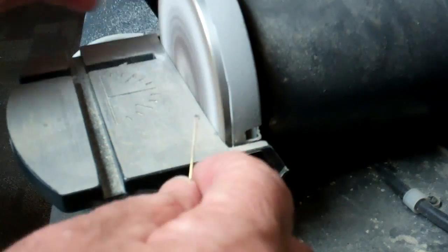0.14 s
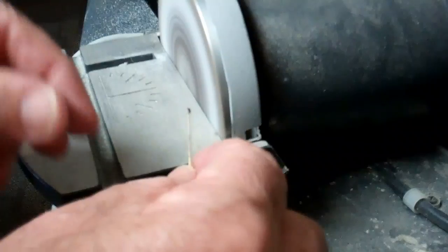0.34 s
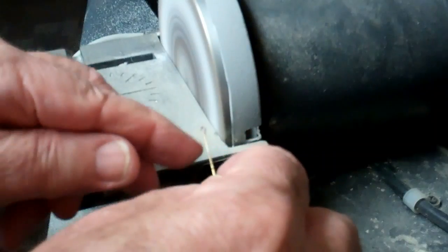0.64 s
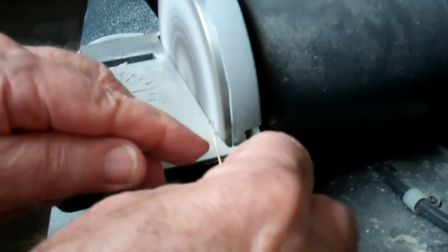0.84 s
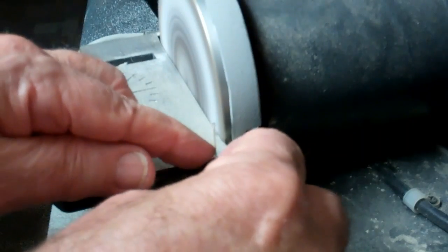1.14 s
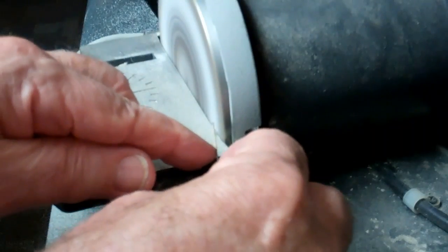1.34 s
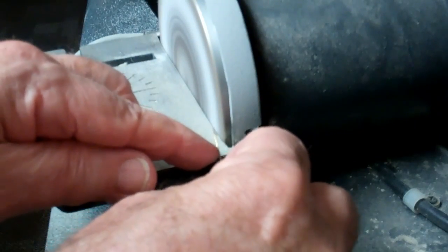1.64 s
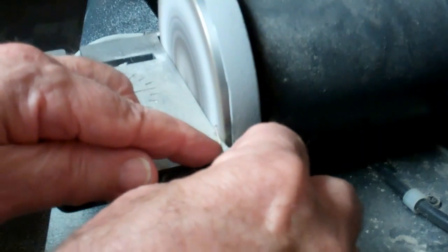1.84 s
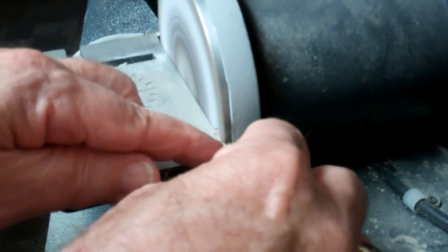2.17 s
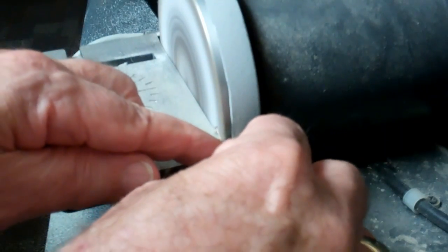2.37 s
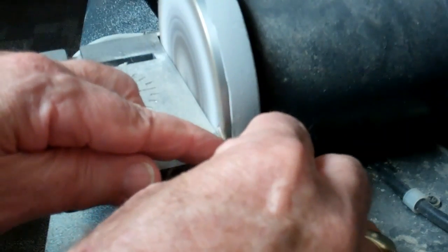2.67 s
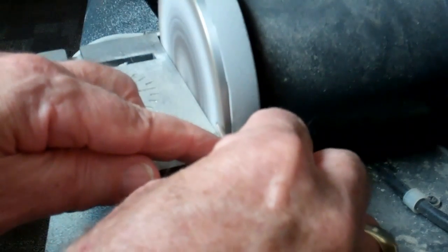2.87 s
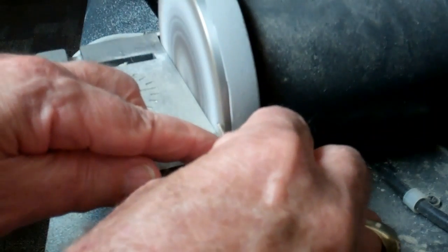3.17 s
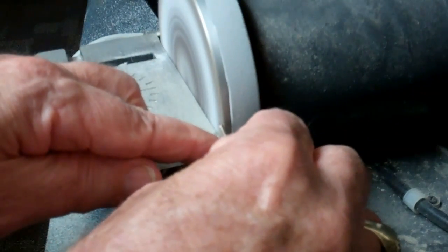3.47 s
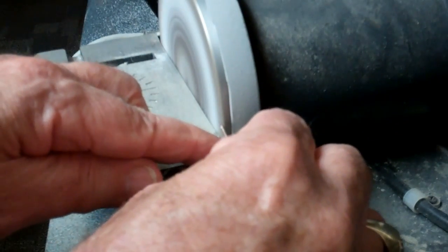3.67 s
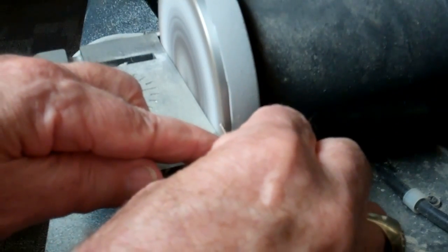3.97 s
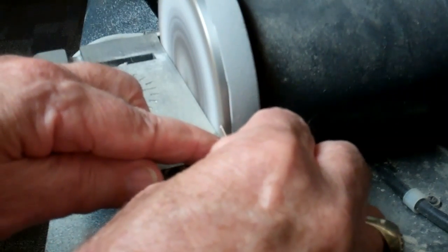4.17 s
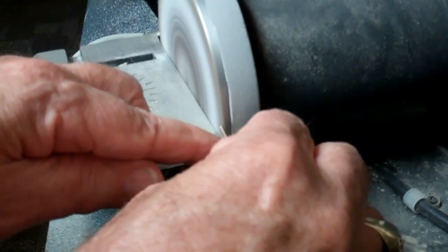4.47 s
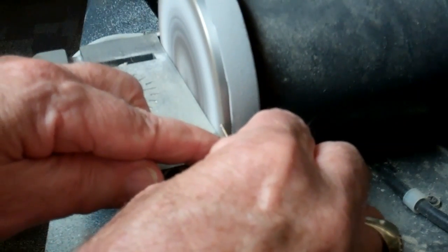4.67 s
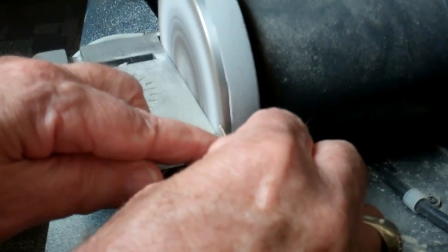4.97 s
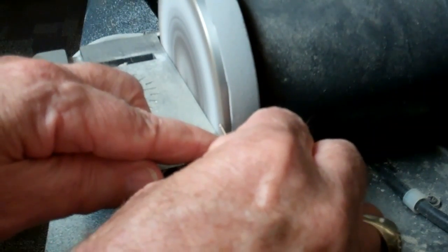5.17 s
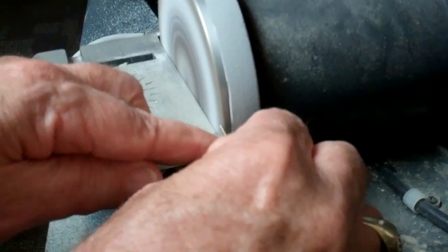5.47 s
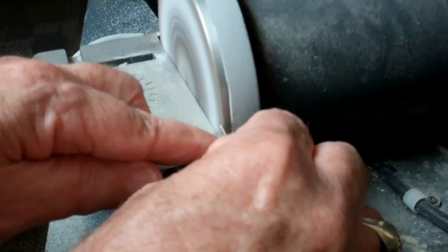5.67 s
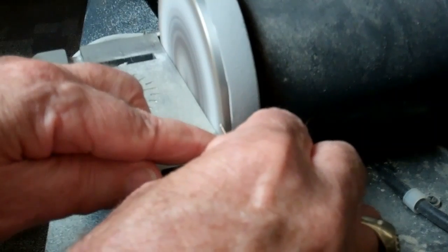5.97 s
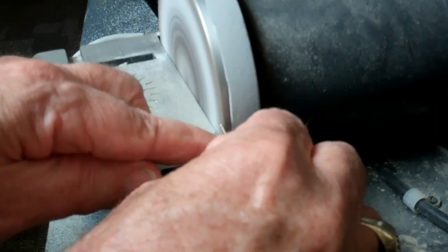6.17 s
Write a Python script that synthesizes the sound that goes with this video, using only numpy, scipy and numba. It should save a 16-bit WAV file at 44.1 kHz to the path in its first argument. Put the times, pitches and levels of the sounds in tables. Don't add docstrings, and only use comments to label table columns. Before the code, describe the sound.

Close electric motor start-up with a rattling shudder, then constant hum and hiss with whistling swells, followed by bright, gritty metal scraping on a spinning disc.

```python
import sys
import numpy as np
from scipy import signal
from scipy.fft import rfft, irfft
from scipy.io import wavfile
from scipy.ndimage import uniform_filter1d
from numba import njit

SR = 44100
rng = np.random.default_rng(int(sys.argv[2]) if len(sys.argv) > 2 else 0)


def gain_from_decibels(decibels):
    exponent = np.asarray(decibels, float) / 20
    return 10 ** exponent


def put_to_file(sound):
    columns = np.atleast_2d(sound).T
    safe = np.clip(columns, -1, 1)
    whole_steps = np.round(safe * 32767)
    wavfile.write(sys.argv[1], SR, whole_steps.astype(np.int16))


N = 278622
T = np.arange(N) / SR
F = np.fft.rfftfreq(N, 1 / SR)

SHAFT_HZ, MAINS_HZ, BALL_HZ = 59.71, 60, 261.02
LOCK_S = 0.41
TOP_HZ = 14200

# pitch_hz, left_minus_right_db
MOTOR_PAN = [(60, -2.5), (110, 10), (200, -3.5), (380, 2.5), (700, -2.5), (1290, -0.5), (2370, 2.0),
             (4380, 2.5), (8090, 2.5), (14900, 3.0)]
# start_s, length_s, pressure_db, drift_db (by the end), lifted_share (0-1, by the wobble)
STROKES = [
    (4.074, 0.16, -7, -7.5, 0.51),
    (4.296, 0.024, -24, 2, .6),
    (4.616, 0.25, -8.5, -4, 0.53),
    (5.148, .23, -12, -9, 0.84),
    (5.198, 0.11, -18.5, -2, 0.54),
    (5.701, 0.073, -28.5, 8, .5),
    (5.385, .085, -10, -3, .96),
    (5.455, .1, -16, -10, .92),
    (5.753, 0.64, -19, 5, 0.46),
    (5.827, 0.511, -21.5, 5, 0.13),
]


def set_rms(x, db):
    return x * gain_from_decibels(db) / np.sqrt(np.mean(x ** 2))


def along_hz(points):
    hz, value = np.transpose(points)
    return np.interp(np.log(np.minimum(F + 1, TOP_HZ - 100)), np.log(hz), value)


def resonances(modes, order=1):
    total = 0
    for k, (hz, width, db) in enumerate(modes):
        damping = 1j * width * order * F
        peak = damping / (hz ** 2 - F ** 2 + damping)
        total = total + (-1) ** k * gain_from_decibels(db) * peak ** order
    return total


def comes_round(share, hz):
    return 1 / (1 - share * np.exp(-2j * np.pi * F / hz))


def walk(rate):
    hold = int(SR / rate)
    steps = np.repeat(rng.standard_normal(N // hold + 1), hold)
    return 1.3 * uniform_filter1d(uniform_filter1d(steps, hold), hold)[:N]


def ports(drive, colour, pan_db, lag, diffuse_hz):
    direct, left, right = rfft(drive, axis=1)
    diffuse = (F + 250) / (F + diffuse_hz + 250)
    late = np.exp(-2j * np.pi * F * lag / SR)
    shared = np.sqrt(1 - diffuse ** 2) * direct * np.array([late, late ** 0])
    pair = shared + diffuse * np.array([left, right])
    return irfft(pair * colour * gain_from_decibels(np.array([pan_db, -pan_db]) / 2), N, axis=1)


def tone(turns, db, pan_db, lead_rad, flicker_db):
    phase = 2 * np.pi * (turns + rng.random())
    side = np.array([[.5], [-.5]])
    peak = np.sqrt(2) * gain_from_decibels(db + flicker_db * walk(9) + side * pan_db)
    return peak * np.sin(phase + side * lead_rad)


def run_up():
    # start_s, speed_share
    points = [
        (0, 0.074),
        (.2, 0.53),
        (.33, 0.79),
        (.42, .93),
        (.48, 1.0),
    ]
    s, share = np.transpose(points)
    return np.interp(T, s, share)


def slip_beat(speed):
    inrush = np.exp(-(T / 0.055) ** 2)
    buzz = (tone(MAINS_HZ * T, -51, 0.9, 0, 0) + tone(3 * MAINS_HZ * T, -48, 1, 0, 0)) * inrush
    beat = 1 - .5 * np.cos(4 * np.pi * (MAINS_HZ - SHAFT_HZ) * (T - 1.33))
    return tone(2 * MAINS_HZ * T, -46.5, .4, 0.092, 0.4) * beat * speed ** 1.9 + buzz


def start_up(speed):
    # pitch_hz, width_hz, level_db
    housing = [(180, 25, -8), (470, 30, -4), (950, 30, -3), (1380, 30, -4), (3070, 50, -3), (3780, 40, -5)]
    # shaft_multiple, centre_s, length_s, level_db
    sweeps = [
        (58, .285, .018, -41),
        (66, .44, .02, -38),
        (2.8, .46, .025, -42),
    ]
    shake_db = -29 - 300 * np.clip(T - LOCK_S, 0, None)
    shake = ports(rng.standard_normal((3, N)), resonances(housing), along_hz(MOTOR_PAN), 2.6, 7000)
    out = set_rms(shake, 0) * gain_from_decibels(shake_db) * speed ** 1.5
    turns = SHAFT_HZ * np.cumsum(speed) / SR
    for multiple, centre_s, length_s, db in sweeps:
        out = out + tone(multiple * turns, db, 0, 0, 0) * np.exp(-((T - centre_s) / length_s) ** 2)
    return out


def running_tones(speed):
    # shaft_multiple, level_db, left_minus_right_db, left_lead_rad
    shaft_lines = [(1, -48.0, -0.0, -0.0), (3, -48.4, -1.9, -0.1), (4, -42.6, -0.3, -0.2),
                   (5, -49.4, -0.5, -0.2), (7, -58.8, 3.5, 0.1), (8, -44.5, 2.8, -0.5),
                   (9, -58.1, 2.2, 0.2), (11, -56.7, 0.2, -0.1), (12, -40.4, -2.3, -0.5),
                   (13, -52.8, -2.6, 0.0), (16, -47.4, -1.7, -0.1), (18, -50.5, -1.4, 0.1),
                   (20, -50.8, -0.5, 0.4), (29, -53.8, 3.1, 0.3), (33, -55.7, 3.5, -0.1),
                   (49, -50.8, 2.5, -1.1), (50, -49.2, 6.4, -0.2), (51, -41.8, 3.6, -0.1),
                   (53, -53.9, 8.0, 0.5)]
    # shaft_multiple, mains_multiple, level_db, left_minus_right_db, left_lead_rad
    slot_lines = [(0, 2, -45.6, 0.4, 0.1), (17, 0, -40.0, -3.3, -0.2), (17, 2, -38.7, -0.8, -0.1),
                  (17, 4, -45.8, -2.5, 0.3), (17, 6, -32.7, -1.7, 0.2), (18, 4, -48.5, -2.2, 0.5),
                  (18, 6, -47.4, 0.1, 1.3), (19, 6, -47.2, -2.7, -0.3)]
    # ball_multiple, level_db, left_minus_right_db, left_lead_rad
    ball_lines = [(1, -52.3, -0.4, -0.1), (10, -57.3, -7.7, -1.1), (11, -52.1, -3.7, -0.9),
                  (12, -42.8, 2.8, -0.3), (13, -39.1, -2.2, -1.3), (14, -47.2, 2.8, -0.6),
                  (15, -48.0, -8.0, -1.3), (16, -48.9, 5.1, 0.2)]
    # pitch_hz, level_db, left_minus_right_db, left_lead_rad
    race_lines = [(157.1, -46.9, -0.6, -0.1), (906.2, -45.7, -0.5, -0.1), (1325.8, -50.6, 0.1, 0.8),
                  (1362.9, -50.2, -4.7, 1.0), (3316.5, -50.8, 2.8, -0.7), (3428, -55.1, 1.9, -1.4),
                  (3765.6, -50.5, 3.4, -0.4), (3867.4, -53.6, 2.7, -1.5), (4118.5, -53.1, 8.0, 0.5),
                  (5162.1, -51.8, 8.0, -2.3), (5540.5, -48.6, 7.1, -1.4), (5547.7, -50.7, 7.0, -2.0),
                  (5617.2, -51.4, 7.2, -2.5), (5943.8, -49.7, 7.0, -2.0), (6467.2, -49.7, 1.9, -2.3),
                  (6505.2, -50.1, -2.4, -2.3)]
    run_s = np.cumsum(speed) / SR + 6e-6 * walk(5.24)
    shaft = sum(tone(k * SHAFT_HZ * run_s, *rest, 0.1 + 0.038 * k) for k, *rest in shaft_lines)
    slots = sum(tone(k * SHAFT_HZ * run_s + m * MAINS_HZ * T, *rest, .6) for k, m, *rest in slot_lines[1:])
    balls = sum(tone(k * BALL_HZ * run_s, *rest, 1.15) for k, *rest in ball_lines)
    race = sum(tone(hz * run_s, *rest, 2.9) for hz, *rest in race_lines)
    return (shaft + balls + race * gain_from_decibels(-.5)) * speed ** 7.5 + slots * gain_from_decibels(.8) * speed ** 9.5


def roar(speed):
    # pitch_hz, density_db_per_hz
    rumble_db = [(18, -44), (30, -30), (103, -21.5), (149, -13), (194, -14), (238, -7.5), (340, -4.5),
                 (467, 1), (618, -15.5), (717, 0.5), (1120, 1), (1230, -11), (1350, -6), (1490, -7),
                 (2600, -12.5), (3380, -28), (5720, -120)]
    hiss_db = [(1410, -22.5), (2400, -24.5), (2740, -16.5), (3060, -4), (3230, -7), (3500, -2.5),
               (3580, -6.5), (4440, -7.5), (5540, -3.5), (6670, -5), (7460, -12), (8840, -8), (9810, -15),
               (12900, -10), (14100, -9.5)]
    # pitch_hz, width_hz, level_db
    panels = [(2145, 29, 20), (3100, 57, -12.5), (3650, 22, 2.5), (4210, 140, -9), (5360, 95, -9),
              (6230, 44, -7), (6620, 90, -6.5)]
    pan_db = along_hz(MOTOR_PAN)
    noise = rng.standard_normal((2, 3, N))

    pull = 1 + 0.26 * np.sin(4 * np.pi * MAINS_HZ * T) + 0.13 * np.sin(8 * np.pi * MAINS_HZ * T)
    throb = noise[0] * pull * gain_from_decibels(0.66 * walk(14))
    rumble = ports(throb, gain_from_decibels(along_hz(rumble_db)), pan_db, 2.2, 7400)

    angle = 2 * np.pi * np.cumsum(speed) / SR
    flap = 1 + 0.062 * np.sin(SHAFT_HZ * angle) + 0.089 * np.sin(BALL_HZ * angle)
    air = gain_from_decibels(along_hz(hiss_db)) * (1 + abs(resonances(panels)) * gain_from_decibels(4))
    air = air * comes_round(.25, BALL_HZ / 11)
    hiss = ports(noise[1] * flap * gain_from_decibels(0.48 * walk(20)), air, pan_db, 2.68, 2670)

    surge_db = 2 * np.exp(-((T - LOCK_S - .04) / 0.28) ** 2)
    rumble = set_rms(rumble, -30) * gain_from_decibels(24 * (speed - 1))
    return rumble + set_rms(hiss, -26.5) * speed ** 1.83 * gain_from_decibels(surge_db)


def singing(speed):
    # peak_s, build_up_s, level_db
    swells = [
        (.48, .2, -40),
        (1.08, 0.26, -36),
        (2.03, .25, -28.5),
        (2.87, 0.33, -26.5),
        (3.62, 0.28, -26),
        (4.41, 0.28, -27),
        (5.17, .25, -27),
        (5.86, 0.32, -36),
    ]
    loudness = gain_from_decibels(-53)
    for peak_s, rise_s, db in swells:
        width_s = np.where(T < peak_s, rise_s, 0.097)
        loudness = loudness + gain_from_decibels(db) * np.exp(-((T - peak_s) / width_s) ** 2)
    return tone(3097 * T + .025 * walk(12), 0, 2.2, -.95, 1.0) * loudness * speed


def strokes():
    lean_s, let_go_s = 0.033, 0.0034
    press, fresh_db, lift = 1e-9, 0, 0
    for start_s, length_s, db, drift_db, share in STROKES:
        age = np.clip(T - start_s, 0, None)
        gone = np.clip(age - length_s, 0, None)
        one = gain_from_decibels(db + drift_db * age / length_s) * (1 - np.exp(-age / lean_s)) * np.exp(-gone / let_go_s)
        press = press + one
        lift = lift + one * share
        fresh_db = fresh_db + one * 2 * np.exp(-age / 0.024)
    light = (np.maximum(press, gain_from_decibels(-40)) / gain_from_decibels(-18)) ** (0.89 - 1)
    return press, light * gain_from_decibels(fresh_db / press), np.clip(lift / press, 0, 1)


def grit_bites():
    # start_s, peak_db
    bites = [(4.0805, -34), (4.0977, -10), (4.6199, -42), (4.6314, -23), (4.6492, -12), (5.1567, -9),
             (5.1679, 2.5), (5.391, 2), (5.406, -1), (5.423, 5), (5.442, 2), (5.457, 6)]
    force = 0
    for start_s, db in bites:
        age = np.clip(T - start_s, 0, None)
        force = force + gain_from_decibels(db - 12) * (1 - np.exp(-age / .0008)) * np.exp(-age / .0035)
    return force


def grinding():
    # pitch_hz, width_hz, level_db
    wire = [(3350, 58, -13), (5310, 62, .5), (5790, 46, -7), (8210, 76, -2), (8790, 63, -9)]
    # pitch_hz, density_db_per_hz
    grit = [(1500, -60), (2600, -29), (4000, -35), (4800, -21), (6300, -21), (7050, -36), (7600, -14),
            (9200, -24), (9750, -16), (11000, -23), (11700, -15), (12300, -13), (13000, -18), (14100, -14)]
    press, treble, lift = strokes()
    turn = SHAFT_HZ * T + 1.0 / (2 * np.pi)
    uneven = gain_from_decibels(1.6 * rng.standard_normal(N // 500))[(turn + .5).astype(int)]
    angle = 2 * np.pi * turn
    high_spot = (.5 + .5 * np.cos(angle + .4 * np.cos(angle))) ** 1.05
    wobble = (1 - lift + lift * high_spot) / (1 - 0.35 * lift)
    press = press * uneven * wobble * gain_from_decibels(-1.5)
    bite = grit_bites()
    bright = press * treble + bite * gain_from_decibels(-4.5)
    press = press + bite

    grains = rng.standard_normal((2, 3, N)) * gain_from_decibels(1.3 * rng.exponential(size=(2, 1, N)))
    grains = irfft(rfft(grains, axis=2) * comes_round(.6, SHAFT_HZ), N, axis=2)
    upper = 1 / (1 + (7050 / (F + 1)) ** 20)
    ring = gain_from_decibels(along_hz(grit)) * gain_from_decibels(2.0) * 1j + resonances(wire, order=2)
    pan_db = np.full(len(F), 7.0)
    out = 0
    for drive, force, band, db in zip(grains, (press, bright), (1 - upper, upper), (-.5, .3)):
        colour = ring * band * (F < TOP_HZ)
        gain = gain_from_decibels(db) / np.sqrt(np.mean(drive ** 2) * np.mean(abs(colour) ** 2))
        out = out + gain * ports(drive * force, colour, pan_db, 0, 9000)
    return out * wobble ** .4 * (T > STROKES[0][0])


def scene():
    speed = run_up()
    motor = slip_beat(speed) + start_up(speed) + running_tones(speed) + roar(speed)
    return motor + singing(speed) + grinding()


@njit
def follow(x, up, down):
    out, e = np.empty(len(x)), 0.
    for i in range(len(x)):
        e += (x[i] - e) * (up if x[i] > e else down)
        out[i] = e
    return out


def gain_control(dry):
    grab_s, hang_s, recover_s = 0.01, 0.051, 0.12
    treble = irfft(rfft(dry.mean(0)) / (1 + (4730 / (F + 1)) ** 8), N)
    power = uniform_filter1d(treble ** 2, size=200)
    heard = follow(np.sqrt(abs(power)), 1 / (grab_s * SR), 1 / (recover_s * SR))
    heard = follow(heard, 1., 1 / (hang_s * SR))
    return (1 + (heard / gain_from_decibels(-26.5)) ** 16) ** (-0.94 / 16)


def roll_off(x):
    return signal.sosfilt(signal.butter(12, 15540, fs=SR, output="sos"), x)


def record(dry):
    ducked = dry * gain_control(dry)
    mix = irfft(rfft(ducked, axis=1) * (F < TOP_HZ), N, axis=1)
    return roll_off(mix)


dry = scene()
out = record(dry)
put_to_file(out)
```